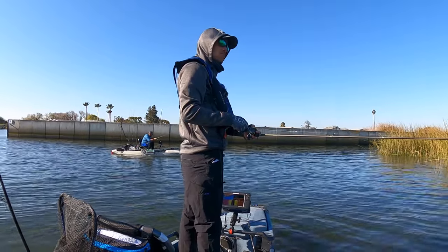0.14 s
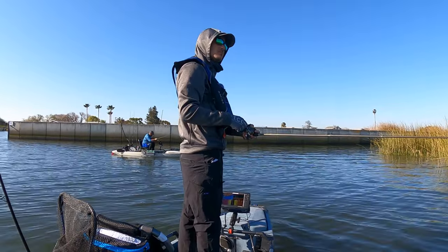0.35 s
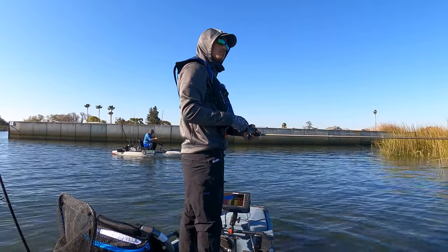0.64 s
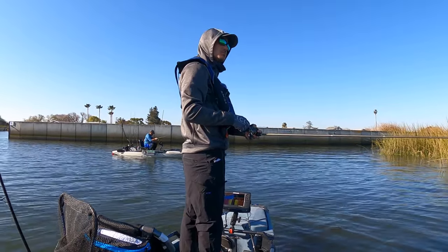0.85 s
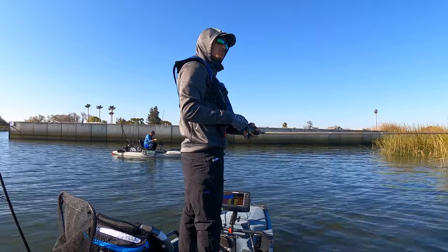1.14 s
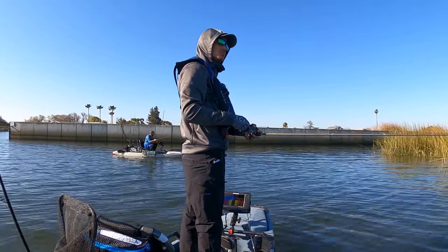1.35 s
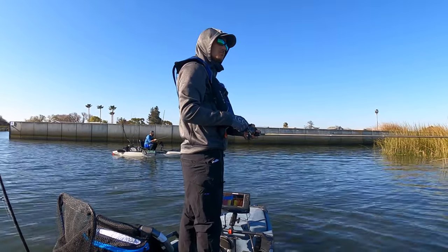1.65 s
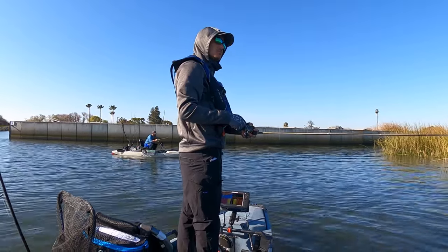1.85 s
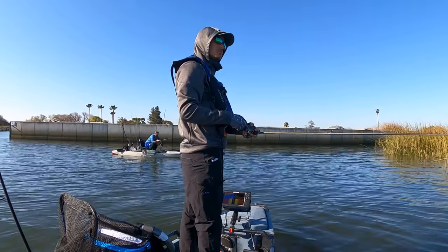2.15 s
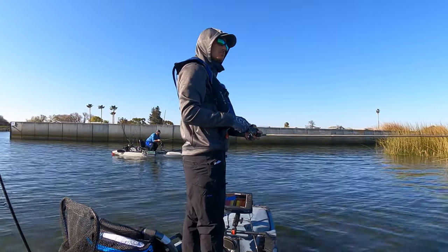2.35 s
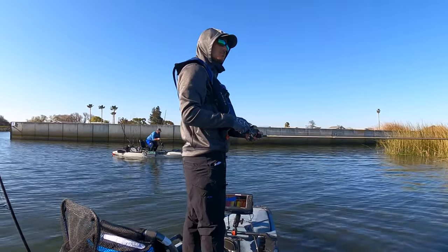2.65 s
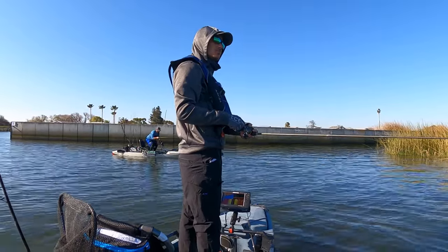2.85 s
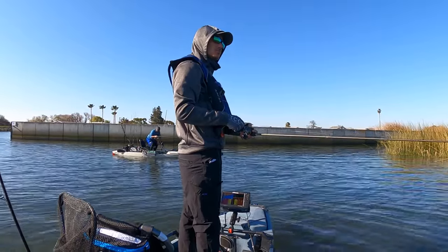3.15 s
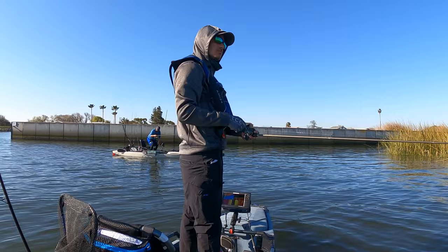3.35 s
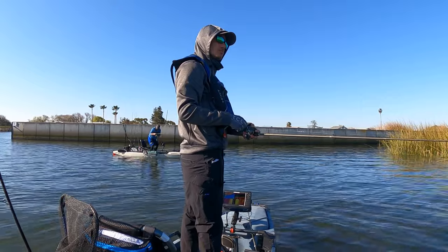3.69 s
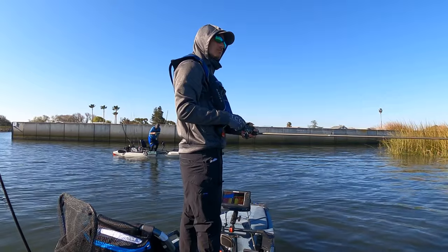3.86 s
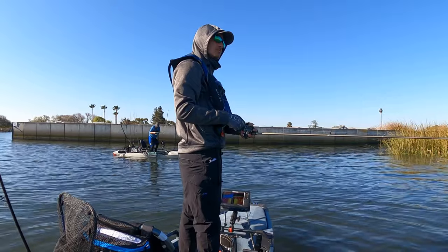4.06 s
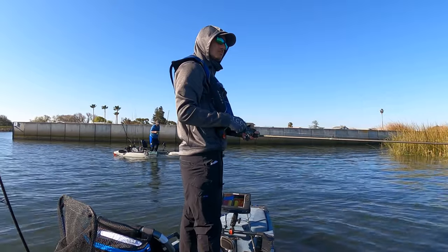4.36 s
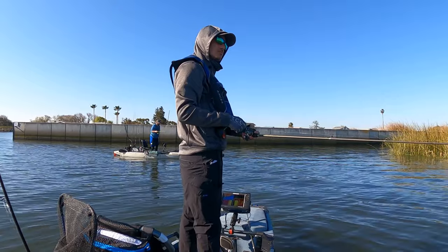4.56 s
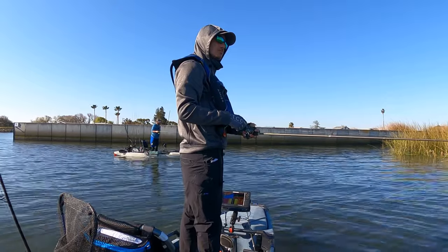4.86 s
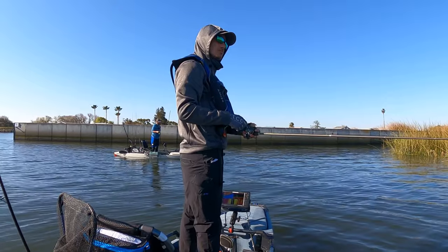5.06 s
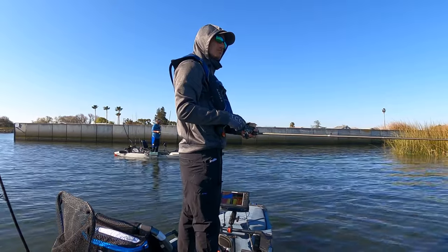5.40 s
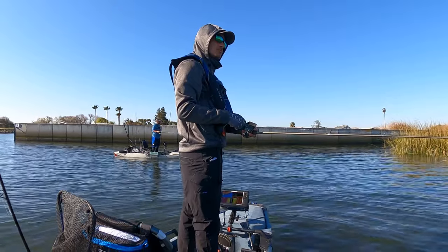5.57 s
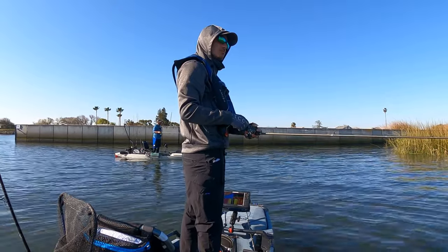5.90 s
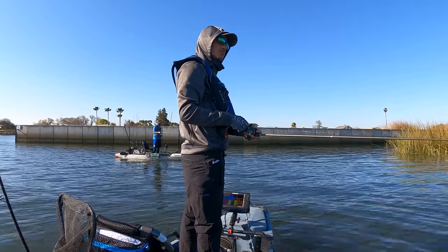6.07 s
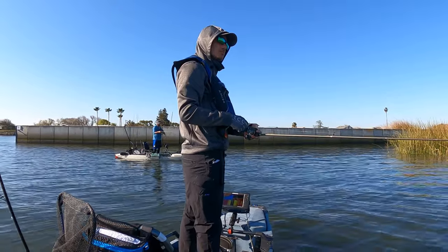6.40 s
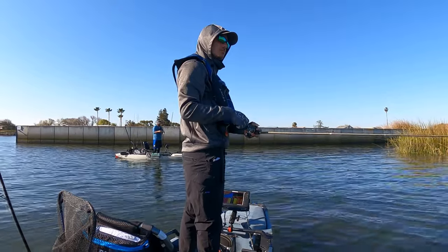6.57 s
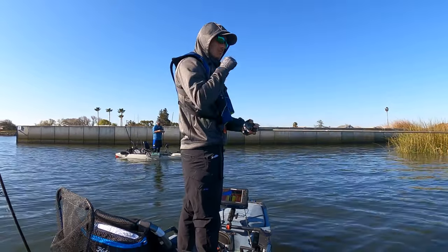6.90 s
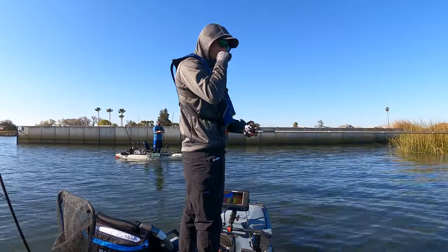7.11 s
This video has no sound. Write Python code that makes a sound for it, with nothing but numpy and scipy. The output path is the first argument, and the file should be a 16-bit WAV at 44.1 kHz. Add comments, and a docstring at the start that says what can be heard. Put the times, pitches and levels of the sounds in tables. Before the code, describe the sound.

A quiet open-water setting heard from a small boat's deck for about 7 seconds. Throughout, distant motorboat engines hum low, with several wavering tones that beat, fade and return over a burbling exhaust rumble, a faint wash and soft hiss. Ripples touch the hull close by: small ticks and plops around 0.1, 0.6 and 1.1 seconds, clearer snaps at 1.4 and 2.2. At 2.3 a hard object knocks the deck with a crack, hollow boom and slight rattle; a much weaker knock follows 0.1 second later. Afterwards come gurgling swells and bubbles near 3, a slightly stronger lap at 4.8 towards the left, and more at 5.65, 6.5 and 6.6. Very faint thin peeps pass near 0.2, 2, 5.9 and 6.3. From about 5.7 deep, wind-like buffeting rises in gusts, with dull thuds clustered around 6.1 to 6.5 and again at 7.2.

```python
"""Calm water around a small boat

Heard from the deck: far motorboat engines, made of wavering sine tones, drone and beat over a noisy
exhaust rumble and a faint wash. Ripples of shaped noise tick and plop at the hull, among ringing bubbles,
soft swells and a few thin peeps. Something knocks on the deck and a weaker knock follows; decaying tones
and noise make both. Near the end a low buffeting of deep noise rises, with a few dull thuds."""
import sys
import numpy as np
from scipy.fft import rfft, irfft, next_fast_len
from scipy.io import wavfile
from scipy.ndimage import map_coordinates

SR = 44100
rng = np.random.default_rng(int(sys.argv[2]) if len(sys.argv) > 2 else 0)


def int16_out(signal):
    """Quantize to a 16-bit WAV file."""
    q = np.round(np.clip(np.atleast_2d(signal).T, -1, 1) * 32767)
    wavfile.write(sys.argv[1], SR, q.astype(np.int16))


N = 319284  # length in samples

# how alike left and right are, for far sounds: (frequency [Hz], likeness [0 to 1])
FAR_ALIKE = [(60, 1), (150, 0.98), (300, 0.88), (500, 0.72), (900, .55), (1800, 0.45), (3600, 0.11),
             (7000, 0.69)]
# the same for sounds close by: (frequency [Hz], likeness [0 to 1])
NEAR_ALIKE = [(300, 1), (2000, 0.81), (7000, 0.77), (12000, 0.28)]


def amp(db):
    """Turn decibels into a plain factor."""
    return 10 ** (np.asarray(db) / 20)


def unit(x):
    """Scale x to rms 1."""
    return x / np.sqrt(np.mean(x ** 2) + 1e-20)


def along(points, hz):
    """Read a curve of (Hz, value) points on a log frequency axis."""
    f, v = np.transpose(points)
    return np.interp(np.log(hz + 1), np.log(f + 1), v)


def curves(rows):
    """Give one value per sample for each column after the time."""
    s, *cols = np.transpose(rows)
    return [np.interp(np.arange(N) / SR, s, c) for c in cols]


def wobble(rate):
    """Draw a smooth random curve with rate knots a second."""
    knots = rng.standard_normal(int(N * rate / SR) + 4)
    return map_coordinates(knots, [np.arange(N) * rate / SR])


def filtered(x, response):
    """Shape x by a response that depends on frequency."""
    n = x.shape[-1]
    m = next_fast_len(n + SR // 10)
    return irfft(rfft(x, m) * response(np.fft.rfftfreq(m, 1 / SR)), m)[..., :n]


def rush(spectrum, alike=FAR_ALIKE, size=N):
    """Make stereo noise of rms 1 with a given colour and left-right likeness."""
    def colour(hz):
        turn = np.arccos(np.clip(along(alike, hz), -1, 1)) / 2
        return amp(along(spectrum, hz)) * [np.cos(turn), np.sin(turn)]

    mid, side = filtered(rng.standard_normal((2, size)), colour)
    return unit(np.array([mid + side, mid - side]))


def fade(t, t60):
    """Decay by 60 dB in t60 seconds."""
    return np.exp(-np.log(1000) * t / max(t60, 1e-4))


def ring(t, hz, t60, attack):
    """Sound a damped sine with a soft start."""
    return np.sin(2 * np.pi * hz * t) * fade(t, t60) * (1 - np.exp(-t / attack))


def tone(hz):
    """Sound a sine of rms 1 that follows a pitch curve."""
    return np.sqrt(2) * np.sin(2 * np.pi * (np.cumsum(hz) / SR + rng.random()))


def add(track, s, sound, pan_db=0):
    """Mix a sound into the stereo track at time s; pan_db is left minus right."""
    part = track[:, round(s * SR):][:, :sound.shape[-1]]
    part += (sound * amp([[pan_db / 2], [-pan_db / 2]]))[..., :part.shape[1]]


def ambience():
    """A far wash of water and boats slowly brightens and dulls again, over a faint steady hiss."""
    # noise colours: (frequency [Hz], level [dB per Hz])
    wash_body = [(500, -11.5), (850, -14), (1100, 0.5), (1350, 0.5), (1750, -6.5), (2400, -21),
                 (4000, -38.5), (12000, -120)]
    wash_edge = [(1100, -16.5), (1700, 3), (2100, -1), (2600, -10), (3300, -35), (5000, -67), (12000, -120)]
    hiss = [(1000, -3.5), (3000, 3), (4300, 0), (5200, 4), (6300, 1), (7700, 0), (8400, -8.5),
            (10000, -14.5), (12300, -20.5), (13500, -35.5)]
    peak_s, rise_db_per_s, fall_db_per_s = 5.37, 2, 5
    t = np.arange(N) / SR - peak_s
    edge_db = -67.5 + np.minimum(rise_db_per_s * t, -fall_db_per_s * t)
    sway_db = .4 * wobble(2) + .9 * wobble(12)
    body = amp(-66.5 + sway_db) * rush(wash_body)
    edge = amp(edge_db + 2.5 * wobble(13)) * rush(wash_edge)
    return body + edge + amp(-77.0) * rush(hiss)


def engines():
    """Far engines hum and beat over a burbling exhaust; the long path makes their tones fade in and out."""
    # slow engine: (time [s], shaft rate [Hz], levels of the firing tone, its double and triple [dB])
    slow_engine = [(0, 30.11, -48.5, -54, -72), (1.1, 29.82, -62.5, -63.5, -70),
                   (2, 29.9, -52.5, -53, -69.5), (2.6, 29.91, -51.5, -72, -65),
                   (3.7, 29.69, -44, -52.5, -65), (4.15, 29.65, -48, -51.5, -72),
                   (4.55, 29.62, -53.5, -54, -58.5), (5.3, 29.54, -50.5, -53, -71),
                   (5.75, 29.57, -51, -70, -68.5), (6.55, 29.55, -42.5, -58, -60.5),
                   (7.24, 29.8, -59, -57, -65.5)]
    # weak wavering tones: (frequency [Hz], level at the start [dB], level at the end [dB])
    faint_lines = [(42.6, -65, -57.5), (57, -54, -61), (122.5, -64.5, -57.5), (140.8, -60.5, -64.5),
                   (212.7, -69, -71), (256, -70, -69), (273.4, -62.5, -73), (353, -70, -73.5)]
    # two faster engines that beat, before a small trim: (time [s], frequency [Hz], level [dB])
    lower_drone = [(0, 154.3, -45), (1.3, 153.4, -51), (2.2, 153.6, -43.5), (2.7, 153.2, -51),
                   (3.15, 152.7, -47.5), (3.65, 152.7, -66), (4.15, 152.8, -44.5), (4.55, 152.5, -45),
                   (4.9, 151.2, -52.5), (6.2, 150.7, -49), (6.8, 151.8, -51.5), (7.24, 151.9, -41.5)]
    upper_drone = [(0, 158.5, -60.5), (1.08, 158.3, -60), (1.2, 158, -41.5), (1.6, 156.8, -47.5),
                   (2.1, 158, -49), (2.6, 157.5, -51.5), (3.7, 157, -69), (4.6, 159, -45), (5, 158.7, -53),
                   (5.4, 159.2, -48), (6.85, 158.5, -66), (7.1, 158.7, -52)]
    # a tone about an octave above the lower drone: (time [s], frequency [Hz], level [dB])
    drone_octave = [(0, 306.8, -63), (1.3, 307.4, -62), (3.0, 306, -71), (4.1, 305, -55.5),
                    (4.6, 311.2, -72.5), (7.24, 304.7, -71.5)]
    # a fourth engine that weakens early: (time [s], hum level [dB], octave level [dB])
    fading_hum = [(0, -49.5, -69.5), (0.9, -57, -59), (1.4, -55.5, -65), (2.2, -57.5, -65.5),
                  (2.8, -55.5, -76.5), (7.24, -60.5, -76)]
    # exhaust noise colour: (frequency [Hz], level [dB per Hz])
    exhaust = [(25, -25.5), (60, 1), (100, 1.5), (165, -1.5), (188, -7), (220, -9.5), (265, -9), (320, -14),
               (365, -16), (430, -20.5), (550, -25.5), (680, -32.5), (850, -40.5), (1500, -70.5),
               (4000, -120)]

    shaft, *firing_dbs = curves(slow_engine)
    shaft = shaft * (1 + 0.0021 * wobble(3.91))
    firing = 3 * shaft  # three firings per turn
    slow = sum(amp(db + wobble(4)) * tone(k * firing) for k, db in enumerate(firing_dbs, 1))

    faint = 0
    for hz, start_db, end_db in faint_lines:
        level = amp(np.linspace(start_db, end_db, N) + 3.8 * wobble(2.5))
        faint = faint + level * tone(hz * (1 + .012 * wobble(7)))

    lower_hz, lower_db = curves(lower_drone)
    upper_hz, upper_db = curves(upper_drone)
    octave_hz, octave_db = curves(drone_octave)
    lower = amp(lower_db - 0.9 + 1.3 * wobble(5.7)) * tone(lower_hz * (1 + .003 * wobble(8)))
    upper = amp(upper_db - 0.8) * tone(upper_hz)
    octave = amp(octave_db + wobble(5.9)) * tone(octave_hz)

    hum_hz = 118.1 * (1 + .004 * wobble(4))
    hum = sum(amp(db + 4.2 * wobble(6.5)) * tone(k * hum_hz)
              for k, db in enumerate(curves(fading_hum), 1))

    # the exhaust noise pulses once per turn of the slow shaft
    pulse = 1 + 0.17 * tone(shaft)
    rumble = amp(-44.5 + 2.0 * wobble(11)) * unit(rush(exhaust) * pulse)
    return slow + faint + lower + upper + octave + hum + rumble


def peeps():
    """Thin, unsteady whistles swell and fade as they glide."""
    # (time [s], length [s], level before the swell shape [dB], start pitch [Hz], end pitch [Hz])
    peep_table = [(0.224, .08, -78.5, 5170, 4340), (1.896, 0.026, -76, 3180, 2550),
                  (2.02, 0.048, -75, 4940, 3950), (5.854, 0.053, -72, 2540, 2670),
                  (6.29, 0.13, -85, 2940, 3570)]
    out = np.zeros((2, N))
    for s, length, db, start_hz, end_hz in peep_table:
        n = round(max(length, .01) * SR)
        pitch = np.linspace(start_hz, end_hz, n) * (1 + .05 * wobble(700)[:n])
        add(out, s, amp(db) * np.hanning(n) * tone(pitch))
    return out


def buffeting():
    """Low rumble swells in gusts and into short, dull thuds, stronger on the right."""
    # gusts, before wavering and side balance: (time [s], length [s], level [dB])
    gust_table = [(1.755, 0.052, -47.5), (2.698, 0.97, -48), (4.758, 0.067, -47), (5.717, 0.28, -39.5),
                  (6.099, 0.45, -37), (7.133, 0.18, -33)]
    # rumble colour: (frequency [Hz], level [dB per Hz])
    low_air = [(8, -40), (20, 0), (32, 0), (43, 5), (52, 0), (68, 1.5), (120, -16.5), (200, -25),
               (500, -87.5), (1500, -120)]
    # thuds, before a 12 dB lift and panning: (time [s], level [dB], frequency [Hz])
    thud_table = [(5.745, -28.5, 48), (6.116, -26.5, 39), (6.255, -23.5, 43.5), (6.412, -23.5, 48.3),
                  (6.437, -21, 47.4), (6.517, -22, 82), (7.17, -28, 59.4), (7.203, -26.5, 46)]
    attack_s, release_s = 0.07, 0.15  # how fast a gust comes and goes
    now = np.arange(N) / SR
    gusts = 0
    for s, length, db in gust_table:
        edges = np.minimum((now - s) / attack_s, (s + length - now) / release_s)
        gusts = gusts + amp(db) * np.exp(np.minimum(0, edges))
    calm = amp(-53 + 2.9 * wobble(4.5))  # the level between gusts
    level = np.hypot(calm, gusts * amp(3.3 * wobble(7.8)))
    out = level * rush(low_air, [(50, 1.0)]) * amp([[-3], [1.5]])
    t = np.arange(SR // 5) / SR
    for s, db, hz in thud_table:
        add(out, s, amp(db + 12.0) * ring(t, hz, 2.57 / hz, 0.0043), -4.5)
    return out


def swells():
    """Water wells up along the hull and sinks back with a lumpy gurgle."""
    # (time [s], length [s], level before the swell shape [dB], frequency [Hz])
    swell_table = [(0.127, 0.19, -64.5, 1100), (1.017, .14, -68, 900), (2.875, 0.32, -69, 600),
                   (3.052, 0.19, -65.5, 1260), (5.484, .14, -67.5, 680), (6.68, 0.11, -76.5, 1300),
                   (6.982, .2, -71, 801)]
    out = np.zeros((2, N))
    for s, length, db, hz in swell_table:
        n = round(max(length, .02) * SR)
        colour = [(hz / 4, -40), (hz / 1.37, -4), (hz, 0), (hz * 1.18, -5), (hz * 5, -60)]
        gurgle = rush(colour, NEAR_ALIKE, size=n) * amp(3.3 * wobble(60)[:n])
        add(out, s, amp(db) * np.hanning(n) * unit(gurgle))
    return out


def bubbles():
    """Small bubbles ring in a little slosh, rising in pitch as they reach the surface."""
    # the clearest bubbles, before an 8.5 dB lift: (time [s], level [dB], starting pitch [Hz])
    bubble_table = [(0.19, -59, 1285), (0.774, -68, 2660), (1.224, -56.5, 1290), (1.548, -65.5, 2700),
                    (1.63, -62, 1150), (2.955, -53.5, 544.9), (3.21, -51.5, 1340), (4.212, -56.5, 1040),
                    (4.522, -53.5, 2025), (5.072, -67.5, 4130), (6.544, -52.5, 436), (6.725, -58, 1280),
                    (7.011, -59, 1200)]
    out, t = np.zeros((2, N)), np.arange(SR // 10) / SR
    for s, db, hz in bubble_table:
        colour = [(hz / 4, -40), (hz / 1.3, -5), (hz, 0), (hz * 1.1, -6), (hz * 4, -70)]
        slosh = rush(colour, NEAR_ALIKE, size=len(t)) * fade(t, 0.073) * (1 - np.exp(-t / 0.0025))
        blip = ring(t, hz * (1 + 2.6 * t), 0.028, 0.0023)
        add(out, s, amp(db + 8.5) * (blip + 0.27 * slosh), rng.normal(0, 2))
    # many fainter ones at random times, steady in pitch; higher ones are softer
    for when, pitch, size, side in rng.random((60, 4)):
        level = amp(-73.0 + 10 * size - 5 * pitch)
        blip = ring(t, 1100 * 4 ** pitch, 0.02, 0.0013)
        add(out, when * (N - len(t)) / SR, level * blip, 8 * (side - .5))
    return out


def knocks():
    """A hard contact cracks; the deck thumps and rings, its hollow booms just after, loose gear rattles."""
    # (time [s], then levels of hollow, ring, thump, crack and rattle [dB])
    knock_table = [(2.3270, -27.5, -29, -33, -31.5, -57), (2.4254, -44, -61, -41.5, -57.5, -69)]
    # hollow under the deck: (frequency [Hz], level re the hollow [dB], time to the peak [s])
    hollow_modes = [(158, -4, 0.016), (227.4, -3.5, 0.011), (351, -8.5, 0.0083), (507, -8, 0.0079),
                    (554, -1, 0.0084)]
    # ringing deck: (frequency [Hz], level re the ring [dB], time to fall 60 dB [s])
    deck_modes = [(736, -8, .06), (894, -11.5, 0.082), (1015, -14, 0.1), (1340, -11, 0.054),
                  (1744, 0, 0.031), (2040, -4, .04)]
    # the small hard thing that strikes: (frequency [Hz], level re the crack [dB], time to fall 60 dB [s])
    chink_modes = [(3910, -1.5, 0.025), (4400, -5, 0.021), (5260, -10, 0.034), (6220, -6, .02),
                   (6470, -5, 0.016), (7650, -11, 0.015)]
    # noise colours: (frequency [Hz], level [dB per Hz])
    thump_colour = [(80, -23), (160, -3), (300, -7), (480, 5), (700, 5), (1100, -0.5), (1600, -6.5),
                    (2400, -9), (3200, -16), (4200, -14.5), (5500, -23), (8000, -38), (12000, -60.5)]
    crack_colour = [(300, -18), (1000, -2), (1900, 6.5), (2600, 1), (3100, -15), (3550, 8), (3950, 10),
                    (4700, 4), (5900, 11.5), (7600, 0.5), (9500, -3.5), (12500, -15.5), (14500, -39)]
    rattle_colour = [(400, -9), (1500, 10), (3000, 0), (6000, -3), (8000, -13), (12500, -27)]
    out, t = np.zeros((2, N)), np.arange(SR // 3) / SR
    for s, hollow_db, ring_db, thump_db, crack_db, rattle_db in knock_table:
        hollow = 0
        for hz, db, peak_s in hollow_modes:
            rise_and_fall = (t / peak_s * np.exp(1 - t / peak_s)) ** 2
            boom = np.sin(2 * np.pi * (hz * t + rng.random()))
            hollow = hollow + amp(hollow_db + db) * rise_and_fall * boom
        deck = 0
        for hz, db, t60 in deck_modes:
            level = amp(ring_db + db + rng.normal(0, 1)) * rng.choice([-1, 1])
            deck = deck + level * ring(t, hz, t60, 0.00079)
        thump = rush(thump_colour, NEAR_ALIKE, size=len(t)) * (1 - np.exp(-t / .0005)) * fade(t, 0.08)
        crack = amp(crack_db) * fade(t, 0.021) * rush(crack_colour, NEAR_ALIKE, size=len(t))
        for hz, db, t60 in chink_modes:
            crack += amp(crack_db + db) * rng.choice([-1, 1]) * ring(t, hz, t60, .0006)
        add(out, s, hollow + deck + amp(thump_db) * thump + crack, .7)
        # the rattle starts 23 ms later, its grain made by fast level changes
        grain_db = (2.4 * wobble(760) + 3 * wobble(130))[:len(t)]
        grains = unit(amp(grain_db) * rush(rattle_colour, size=len(t)))
        add(out, s + 0.023, amp(rattle_db) * (1 - np.exp(-t / .003)) * fade(t, 0.36) * grains)
    return out


def laps():
    """A ripple snaps on the hull, sprays and leaves a short, hollow slosh of air and water.

    Each also thumps the hull, louder when its snap is fuller in the lows."""
    # (time [s], snap level [dB], snap frequency [Hz], drop an octave below the snap [dB],
    #  splutter time to fall 60 dB [s], slosh level [dB], slosh frequency [Hz],
    #  slosh time to fall 60 dB [s], slosh width [octaves], left minus right [dB])
    lap_table = [(0.056, -62, 4670, 16, 0.017, -64, 1190, .1, .6, 5),
                 (0.067, -79, 7000, 10, .04, -74, 6000, .04, .5, 4),
                 (0.604, -74, 6050, 7, .02, -64, 1950, 0.02, .4, 1),
                 (1.048, -70, 2770, 3, .04, -67.5, 2400, .046, .3, 3),
                 (1.059, -69, 3000, -2, .014, -65, 1700, .035, 1.1, 2),
                 (1.1113, -62, 5000, -3.5, 0.045, -69, 5200, .03, .2, 7.5),
                 (1.4295, -51.5, 2830, 15, 0.014, -57, 2900, 0.022, 1.1, -0.5),
                 (2.0148, -64.5, 8500, 3, .015, -68.5, 4600, .07, 0.46, 4),
                 (2.0215, -75, 9000, 16, .02, -76, 8800, 0.023, .3, 4),
                 (2.1669, -50.5, 2570, 12, 0.019, -47.5, 1760, 0.05, .12, 1),
                 (2.265, -75, 3600, 10, .03, -75, 3500, 0.045, 0.33, 1),
                 (2.531, -64.5, 3715, 4, 0.013, -66.5, 2460, .033, 0.3, -2),
                 (4.134, -78, 6300, 14, .014, -81, 5000, .02, .4, 6),
                 (4.226, -77.5, 6000, 21, .015, -81, 5200, .02, .4, 5),
                 (4.587, -74.5, 2660, 11, 0.013, -68, 2510, .05, .2, 8),
                 (4.8225, -50, 3920, -1.5, 0.0089, -44.5, 1500, .064, 0.83, 10.5),
                 (5.6498, -53.5, 6100, 17, 0.035, -52.5, 7580, 0.0081, 0.064, 0),
                 (5.651, -55.5, 2860, -0.5, 0.071, -56, 1070, .03, 0.65, 12),
                 (5.37, -79, 3800, 10, .015, -80, 2800, 0.03, .5, 3),
                 (6.069, -66, 3100, -0.5, .03, -66, 1950, 0.041, 0.43, 3),
                 (6.489, -54, 2820, 11, 0.0089, -58, 2500, .02, 1.1, -1),
                 (6.5999, -54, 5800, -2.5, .0062, -51.5, 2140, 0.061, 0.4, 10.5),
                 (6.604, -72, 8200, 6, .023, -58, 1150, .05, 0.27, -6)]
    # the hull's dull thump: (frequency [Hz], level [dB per Hz])
    hull_colour = [(80, -22.5), (180, 2.5), (300, -3), (600, -6), (900, -17), (2500, -70)]
    treble_cut = [(8000, 2), (9800, -37.5), (13000, -47)]
    spray_colour = [(5000, -28.5), (8000, 2.0), (12300, -12.0), (13300, -29)]
    lead = 64  # samples of room ahead of the pulse, as the filters spread it both ways
    out, t = np.zeros((2, N)), np.arange(SR // 8) / SR
    onset = 1 - np.exp(-t / 0.0026)

    def sized(x, db):
        """Set a level that counts the sound's energy as if spread over 15 ms."""
        return amp(db) * unit(x) * np.sqrt(.015 / t[-1])

    for (s, snap_db, snap_hz, thin_db, splutter_t60,
         slosh_db, slosh_hz, slosh_t60, octaves, pan_db) in lap_table:
        # one sharp pulse, a short splutter and a weak tail scattered by the deck
        burst = rush([(1000, 0)], NEAR_ALIKE, size=len(t))
        burst = burst * (fade(t, splutter_t60) + amp(-26) * fade(t, .14))
        burst[:, 0] += 10
        burst = np.pad(burst, ((0, 0), (lead, 0)))
        snap_colour = [(snap_hz / 20, -60), (snap_hz / 8, -3 * thin_db), (snap_hz / 2, -thin_db),
                       (snap_hz / 1.36, -1), (snap_hz, 0), (snap_hz * 2.0, -12)]
        snap = filtered(burst, lambda hz: amp(along(snap_colour, hz) + along(treble_cut, hz)))
        spray = filtered(burst, lambda hz: amp(along(spray_colour, hz)))
        # sharper snaps throw more spray: 26 dB more per octave
        spray_db = snap_db - 30.5 + 26 * np.log2(snap_hz / 4240)
        add(out, s - lead / SR, sized(snap, snap_db) + sized(spray, spray_db), pan_db)

        low, high = slosh_hz * 2 ** (-octaves / 2), slosh_hz * 2 ** (octaves / 2)
        slosh_colour = [(low / 4, -32), (low / 1.3, -15), (low, 0),
                        (high, 0), (high * 1.35, -19), (high * 5, -80)]
        slosh = rush(slosh_colour, NEAR_ALIKE, size=len(t)) * onset * fade(t, slosh_t60)
        thump = rush(hull_colour, NEAR_ALIKE, size=len(t)) * onset * fade(t, 0.092)
        # the thump is 1 dB above the low part of the snap
        plop = sized(slosh, slosh_db) + sized(thump, snap_db - thin_db + 1)
        add(out, s, plop, pan_db / 2)
    return out


def scene():
    """Far sounds, a little stronger on the left, lie under the buffeting and the water at the hull."""
    far = (ambience() + engines()) * amp([[.5], [-.5]])
    near = swells() + bubbles() + knocks() + laps()
    return far + peeps() + buffeting() + near


def record(dry):
    """Sound reaches the right side a little early; the deepest bass and the top treble are cut."""
    bass_hz, top_hz = 12, 13500

    def response(hz):
        # 0.45 of a half-sample later on the left and as much earlier on the right
        shift = np.exp(1j * np.pi * hz / SR * np.array([[-.45], [.45]]))
        return shift * (hz < top_hz) * hz ** 2 / (hz ** 2 + bass_hz ** 2)

    return filtered(dry, response)


dry = scene()
out = record(dry)
int16_out(out)
```